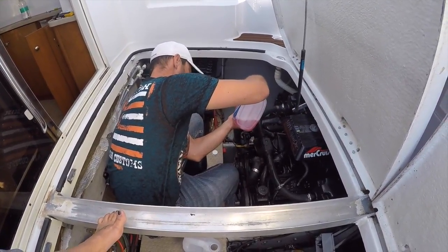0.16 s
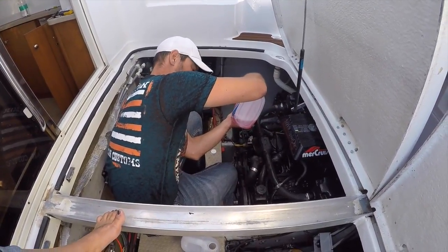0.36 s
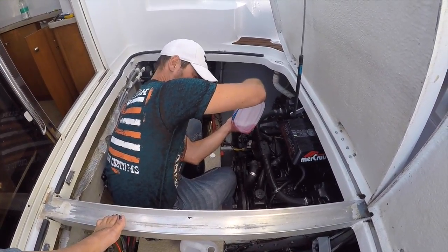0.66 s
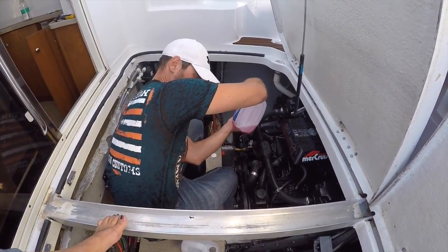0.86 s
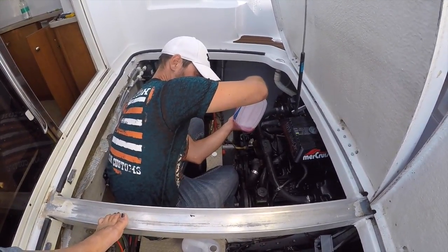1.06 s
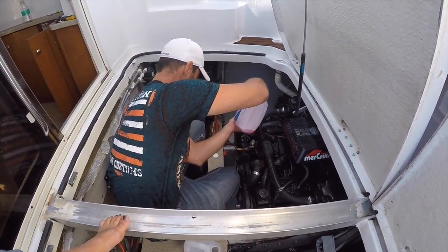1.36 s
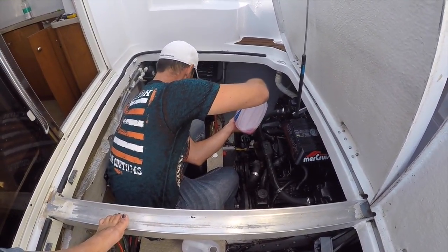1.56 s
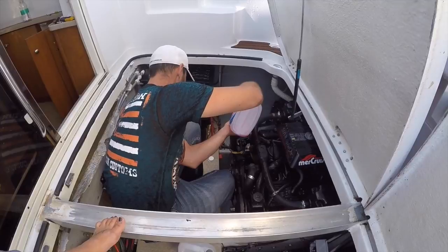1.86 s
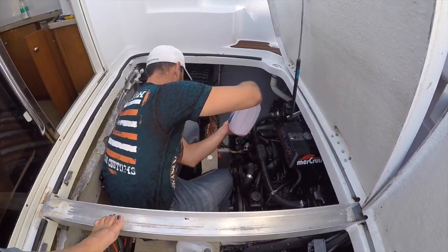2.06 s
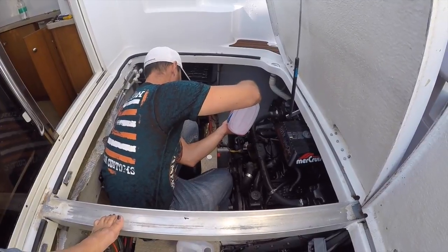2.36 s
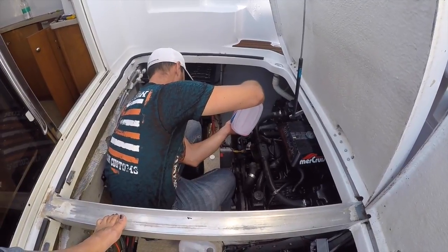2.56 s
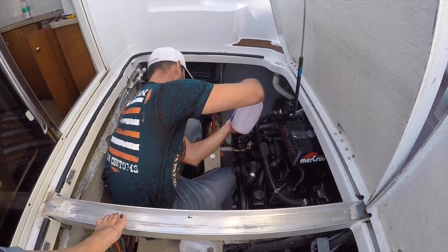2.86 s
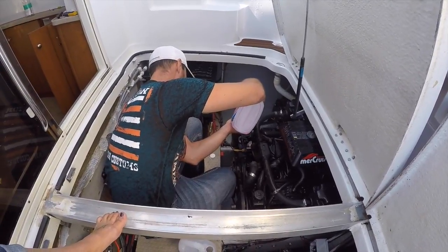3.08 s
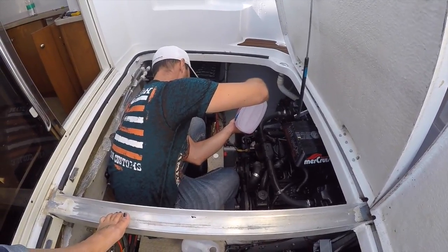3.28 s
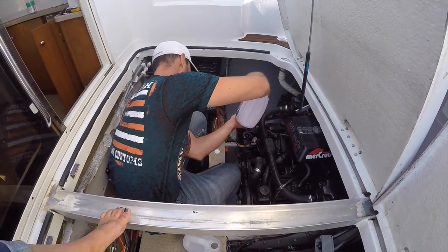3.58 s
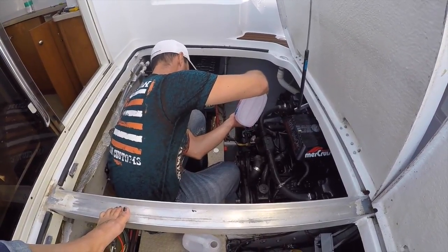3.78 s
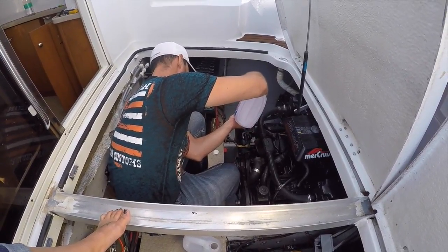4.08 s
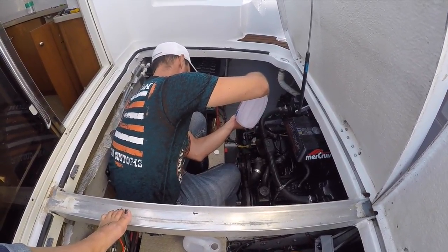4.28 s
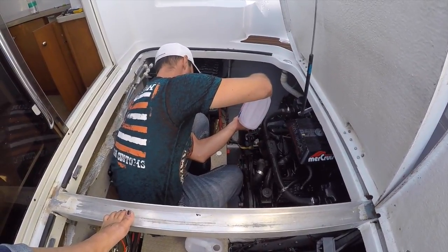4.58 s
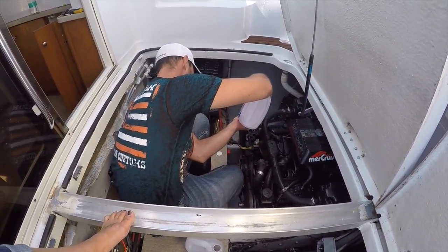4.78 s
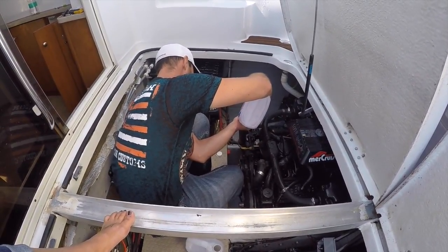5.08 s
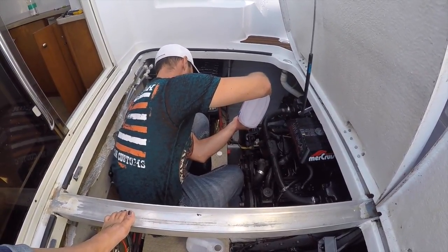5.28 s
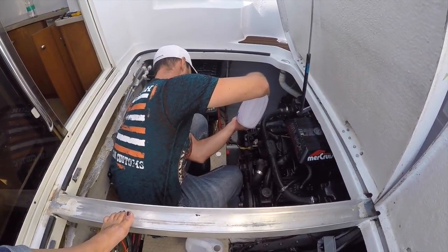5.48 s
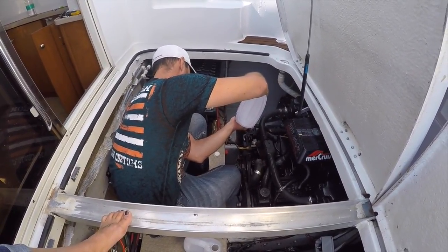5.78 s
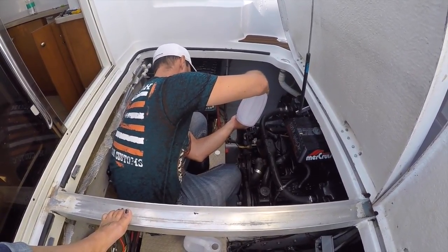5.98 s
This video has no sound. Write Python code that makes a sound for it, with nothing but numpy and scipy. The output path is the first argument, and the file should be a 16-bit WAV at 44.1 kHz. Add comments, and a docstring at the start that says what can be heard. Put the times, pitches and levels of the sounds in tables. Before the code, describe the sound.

Close, hollow glugging and wet trickling as a plastic jug empties into a hose in a boat's engine space, light wind thumping the microphone.

```python
"""Air glugs into an upturned plastic jug about three times a second as its liquid runs into a hose in a boat.
Large bubbles ring as gliding sines and knock the hollow of the jug; bubble swarms and noise gurgle and spatter.
Sharp ticks and dull glug onsets are noise bursts with short rings. Close walls of the engine space reflect it all.
Light gusts buffet the microphone ports as low noise; behind lie still air, the camera's hiss and a faint whine."""
import sys
import numpy as np
from scipy import signal
from scipy.fft import rfft, irfft, next_fast_len
from scipy.io import wavfile
from scipy.ndimage import uniform_filter1d, map_coordinates

SR = 44100
rng = np.random.default_rng(int(sys.argv[2]) if len(sys.argv) > 2 else 0)


def unload_audio(sound):
    """Save the sound as a 16-bit wav file, at the path given as the first command line argument."""
    columns = np.transpose(np.atleast_2d(sound))
    # keep every value between -1 and 1, then stretch to whole-number steps
    steps = np.round(np.clip(columns, -1, 1) * 32767)
    wavfile.write(sys.argv[1], SR, steps.astype(np.int16))


N = 270620


def glugs(rise=0.043, ring_db=-1.0, knock_db=5, knock_t60_s=0.092, plop_db=-3.0):
    """Large bubbles ring; low ones knock the jug's hollow most, those near 1130 Hz break with the wettest plop."""
    # loudest single bubbles and drops: start_s, pitch_hz, level_db (before the part levels above)
    large_bubbles = [(0.044, 255, -45), (0.238, 468, -47.5), (0.346, 252, -48), (0.358, 155, -42),
                     (0.537, 476, -49), (0.631, 422, -50), (0.665, 320, -42.5), (0.761, 1530, -57),
                     (0.787, 1006, -56), (0.861, 640, -50), (1.023, 252, -46), (1.05, 300, -40),
                     (1.26, 590, -46), (1.271, 306, -53), (1.277, 154, -42), (1.333, 3650, -49),
                     (1.586, 144, -41.5), (1.633, 313, -43), (1.965, 476, -47.5), (2.008, 646, -54),
                     (2.052, 1050, -56), (2.253, 232, -47), (2.369, 980, -56.5), (2.427, 520, -48),
                     (2.51, 253, -44), (2.517, 633, -47), (2.695, 154, -45), (2.7, 263, -43.5),
                     (2.752, 295, -47), (3.077, 160, -41), (3.087, 210, -45.5), (3.107, 1213, -53),
                     (3.161, 258, -44.5), (3.166, 663, -48), (3.409, 199, -43), (3.423, 221, -45),
                     (3.424, 816, -41.5), (3.722, 995, -53), (4.009, 1010, -52), (4.129, 3404, -52),
                     (4.262, 462, -48.5), (4.387, 4590, -50), (4.581, 280, -50), (4.611, 1050, -50.5),
                     (4.872, 335, -39.5), (4.922, 297, -40.5), (4.943, 1080, -53), (4.971, 1660, -57),
                     (5.152, 483, -47), (5.164, 297, -47), (5.2, 875, -54), (5.469, 975, -47.5),
                     (5.67, 224, -46.5), (5.717, 765, -46.5), (5.718, 238, -46.5), (5.985, 1000, -50),
                     (5.991, 238, -49)]
    ref_t60_s, ref_hz, t60_slope = 0.087, 294, 0.33  # smaller bubbles die sooner, by this power of pitch
    t = np.arange(SR // 4) / SR
    rings, knocks = np.zeros(N), np.zeros(N)
    for start_s, hz, db in large_bubbles:
        t60_s = ref_t60_s * (ref_hz / hz) ** t60_slope
        glide = rise * min(1, 700 / hz)  # small bubbles hardly glide
        add(rings, start_s, amp(db + ring_db) * bubble(t, hz, t60_s, glide))

        plop = around(hz, 1130, octaves=1.74) * burst(hz, octaves=0.54, t60_s=0.086)
        add(rings, start_s, amp(db + plop_db) * plop)

        knock = min(1, 400 / hz) * amp(-60 * t / knock_t60_s) * rng.standard_normal(len(t))
        add(knocks, start_s, amp(db + knock_db) * knock)
    return in_space(rings + filtered(knocks, hollow), left_db=-2.5)


def stream():
    """Air gulps into the jug, liquid gurgles down the hose, droplets splash and throw a fine spray."""
    # spectra of air gulps, hose gurgle, splash, middle-sized drops, fine spray: freq_hz, level_db (per Hz)
    gulp_spectrum = [(70, -24), (120, 13), (160, -4), (220, -7), (300, -1.5), (370, -7), (480, -14),
                     (900, -60)]
    gurgle_spectrum = [(250, -24), (400, 1.5), (480, -0.5), (650, 1), (850, -4.5), (1100, -5), (1500, -35),
                       (2500, -46)]
    splash_spectrum = [(600, -4), (1200, -7), (1750, 0), (2400, -4.5), (3100, -5), (4000, -24), (6000, -44)]
    trickle_spectrum = [(2200, -47), (3200, -4.5), (3800, 1), (4150, -2.5), (4550, -1), (5100, -2),
                        (5800, -17), (8000, -10)]
    spray_spectrum = [(3000, -31), (5500, 2), (8000, 0), (9500, 1.5), (12000, -0.5), (15000, 1.5)]
    gulp_gain, splash_gain, trickle_gain, spray_gain = pouring()

    air = swarm(rate_hz=180, low_hz=136.4, high_hz=344.4, cycles=11.7, spread_db=8.5, rise=0.11, size=4096)
    gulp = churn(air, gulp_spectrum, hollow_db=1)

    hose = swarm(rate_hz=300, low_hz=382.3, high_hz=1437, cycles=31.0, spread_db=9.5, rise=0.048, size=2600)
    gurgle = churn(hose, gurgle_spectrum, hollow_db=-2)

    drops = swarm(rate_hz=260, low_hz=1074, high_hz=3220, cycles=20.0, spread_db=4.0, rise=0.12, size=800)
    splash = coloured(drops + amp(-4) * rng.standard_normal(N), splash_spectrum)

    droplets = swarm(rate_hz=260, low_hz=2880, high_hz=6230, cycles=21, spread_db=9.5, rise=0.09, size=400)
    trickle = coloured(droplets + amp(-7.5) * rng.standard_normal(N), trickle_spectrum)

    mist = swarm(rate_hz=900, low_hz=4440, high_hz=14400, cycles=5.5, spread_db=49, rise=0.17, size=64)
    spray = coloured(mist + amp(-20.0) * rng.standard_normal(N), spray_spectrum)

    spatter = amp(-5) * splash_gain * splash
    spatter += amp(2.06) * trickle_gain * trickle
    spatter += amp(1) * spray_gain * spray
    return (in_space(amp(-3) * gulp_gain * gulp, left_db=-4.5)
            + in_space(amp(-2.0) * splash_gain * gurgle, left_db=-0.5)
            + in_space(spatter, left_db=-1.4))


def pouring(flow_gulp_db=-2, flow_spray_db=-8, flow_trickle_db=-6, slosh_trickle_db=-5.0):
    """Gains of gulp, splash, trickle and spray: glugs and sloshes ride on a thinning flow; powers add."""
    # air gulping into the jug: start_s, length_s, gulp_db, splash_db, spray_db
    glug_rows = [(0.045, 0.033, -51.5, -67, -82), (0.356, 0.049, -50, -64.5, -67),
                 (0.666, 0.041, -49.5, -60.5, -67), (1.041, 0.034, -55.5, -67, -66.5),
                 (1.259, 0.047, -52.5, -61, -66), (1.591, 0.046, -57, -61, -65.5),
                 (1.906, 0.086, -56, -60, -65), (2.21, 0.02, -55.5, -68, -68),
                 (2.488, 0.098, -56, -60.5, -66), (2.732, 0.048, -54.5, -63.5, -66),
                 (3.065, 0.14, -57, -69, -70), (3.383, 0.07, -54.5, -65.5, -67.5),
                 (3.652, 0.061, -56.5, -63.5, -70.5), (3.985, 0.039, -52.5, -62, -68),
                 (4.29, 0.027, -57, -59.5, -67.5), (4.573, 0.039, -54.5, -62.5, -68.5),
                 (4.894, 0.053, -58, -61.5, -70), (5.153, 0.04, -58.5, -64.5, -67),
                 (5.463, 0.018, -61, -65, -64), (5.629, 0.082, -58, -64, -67),
                 (5.942, 0.035, -57, -70, -75)]
    # slugs of liquid landing in the hose between glugs: start_s, splash_db, spray_db
    slosh_rows = [(0.0, -57.5, -67), (0.14, -67, -81), (0.245, -61.5, -67), (0.54, -61, -75),
                  (0.615, -63, -76), (0.755, -63, -76), (0.87, -60, -71), (1.17, -60.5, -66),
                  (1.335, -62, -78), (1.41, -67, -80), (1.47, -73, -69), (1.71, -62, -82),
                  (2.055, -61, -70), (2.125, -73, -69), (2.31, -58, -72), (2.44, -62, -79),
                  (2.6, -62.5, -68), (2.82, -59.5, -88), (2.88, -77, -69), (3.49, -63.5, -82),
                  (4.19, -64.5, -68.5), (4.39, -64.5, -66.5), (4.515, -62, -72), (4.69, -66, -68),
                  (4.83, -69, -71), (4.97, -67, -80), (5.21, -68, -73), (5.31, -64.5, -71),
                  (5.39, -61.5, -67), (5.75, -61.5, -74)]
    flow_db, thinning_db_per_s, uneven_db = -68, 0.45, 1.5  # thins as the jug empties
    trickle_db, trickle_growth_db_per_s = -4, 0.5  # over the glug's spray; stands out more as the jug empties

    start_s, length_s, gulp_db, splash_db, spray_db = np.transpose(glug_rows)
    patter_db = spray_db + trickle_db + trickle_growth_db_per_s * start_s
    glug_gulp = surges(start_s, length_s, gulp_db, swell_s=0.031, fall_db_per_s=320)
    glug_splash = surges(start_s, length_s, splash_db, swell_s=0.031, fall_db_per_s=200)
    glug_spray = surges(start_s, length_s, spray_db, swell_s=0.031, fall_db_per_s=170)
    # longer swell: drops patter ahead of each glug, before the air breaks in
    glug_trickle = surges(start_s, length_s, patter_db, swell_s=0.11, fall_db_per_s=310)

    slosh_s, slosh_splash_db, slosh_spray_db = np.transpose(slosh_rows)
    slosh = surges(slosh_s, 0.0075, slosh_splash_db, swell_s=0.051, fall_db_per_s=240)
    thrown = surges(slosh_s, 0.0075, slosh_spray_db, swell_s=0.051, fall_db_per_s=240)
    slosh_trickle = amp(slosh_trickle_db) * np.sqrt(slosh * thrown)

    flow = amp(flow_db - thinning_db_per_s * np.arange(N) / SR + uneven_db * wobble(14))
    gulp = [glug_gulp, slosh, amp(flow_gulp_db) * flow]
    splash = [glug_splash, slosh, flow]
    trickle = [glug_trickle, slosh_trickle, amp(flow_trickle_db) * flow]
    spray = [glug_spray, thrown, amp(flow_spray_db) * flow]
    return np.linalg.norm([gulp, splash, trickle, spray], axis=1)


def ticks_and_onsets(noise_t60_s=0.025, noise_db=-6, ring_db=-11):
    """Sharp ticks, and the dull noisy onsets of glugs: a brief burst of noise with short rings near its pitch."""
    # sharp ticks and dull glug onsets: start_s, level_db (before noise_db and ring_db), centre_hz
    onsets = [(0.156, -49, 8500), (0.539, -45, 1750), (0.603, -48, 4530), (1.252, -39, 520),
              (2.252, -41, 1100), (2.469, -44, 1930), (2.608, -47, 6500), (2.745, -44, 3000),
              (2.808, -45.5, 800), (3.082, -47.5, 6100), (3.094, -47, 1150), (3.727, -46, 1300),
              (4.003, -48, 2000), (4.022, -46, 1500), (4.263, -37.5, 3280), (4.514, -45, 2600),
              (4.684, -48.5, 6840), (4.919, -48, 5500), (5.159, -46, 8000), (5.196, -46, 2200),
              (5.454, -45, 1050), (5.717, -50, 796), (5.981, -44.5, 1800)]
    # modes of the jug's plastic wall: freq_hz, level_db, t60_s
    wall_modes = [(1517, 0, 0.04), (1785, 0, 0.031), (2458, -6, 0.078), (3200, -7, 0.02),
                  (3764, -16, 0.074), (4540, -3, 0.052), (5160, -2, 0.045), (7030, -3, 0.017),
                  (9050, -9, .012)]
    track, t = np.zeros(N), np.arange(4096) / SR
    for start_s, db, centre_hz in onsets:
        ring = 0
        for hz, mode_db, t60_s in wall_modes:
            strength = amp(mode_db + rng.normal(0, 5.0)) * around(hz, centre_hz, octaves=1.1)
            ring = ring + strength * bubble(t, hz, t60_s, rise=0)
        noise = burst(centre_hz, octaves=1.3, t60_s=noise_t60_s)
        add(track, start_s, amp(db + ring_db) * ring + amp(db + noise_db) * noise)
    return in_space(track, left_db=-3.0)


def wind(strong_db=-36, steepness=1.92, flutter_db=1.4):
    """Eddies push on each port separately; the small, faster ones grow most in strong gusts."""
    # gusts on the microphone ports: start_s, length_s, level_db, left_over_right_db
    gust_rows = [(0.015, 0.022, -38.5, -6), (0.11, 0.01, -45, 6), (0.404, 0.063, -42.5, 2),
                 (0.495, 0.034, -33.5, -8), (0.587, 0.13, -36, -3), (0.785, 0.011, -34.5, -4),
                 (0.904, 0.022, -43.5, 2.5), (1.066, 0.028, -38, -1), (1.144, 0.01, -45, -8),
                 (1.21, 0.022, -40, 6), (1.288, 0.084, -45.5, 3), (1.59, 0.076, -50, -8),
                 (1.84, 0.076, -50, -8), (3.698, 0.038, -40.5, -16.5), (3.759, 0.013, -35.5, -11),
                 (3.888, 0.2, -40.5, -9.5), (4.089, 0.066, -36.5, -8), (4.234, 0.11, -44.5, -8),
                 (4.488, 0.049, -39, 9.5), (4.649, 0.028, -43, -5), (4.768, 0.022, -41, 13),
                 (4.87, 0.02, -40.5, 6), (4.934, 0.17, -46.5, -1), (5.657, 0.07, -49, 0),
                 (5.89, 0.017, -52, 9), (6.056, 0.024, -46, -9)]
    # spectra of the slow rumble and of the small, fast eddies: freq_hz, level_db (per Hz)
    rumble_spectrum = [(10, -3), (22, 2.5), (35, 3.5), (55, -5), (75, -9), (110, -29), (200, -32),
                       (500, -102)]
    eddy_spectrum = [(30, -27), (60, 9), (80, 4.5), (120, -4.5), (170, -18.5), (250, -30), (600, -70)]
    breeze_db, breeze_left_db = -55, -3.5  # light air between gusts

    start_s, length_s, db, left_db = np.transpose(gust_rows)
    gusts = []
    for side in (1, -1):  # left, right: the two share each gust's power
        port_db = db + 10 * np.log10(2 / (1 + amp(-side * left_db) ** 2))
        gusts.append(surges(start_s, length_s, port_db, swell_s=0.03, fall_db_per_s=177))
    breeze = panned(amp(breeze_db + flutter_db * wobble(8.7)), breeze_left_db)
    push = np.hypot(gusts, breeze)

    # left-right likeness: (freq_hz, coherence)
    slow = even(stereo_noise(rumble_spectrum, [(40, 0.13), (150, 0.27)]), span_s=0.099)
    fast = even(stereo_noise(eddy_spectrum, [(40, 0.19), (150, 0.45)]), span_s=0.061)
    fast_gain = amp(strong_db - 5.0) * (push / amp(strong_db)) ** steepness
    return amp(-0.5) * push * slow + fast_gain * fast


def background():
    """Still outdoor air and the camera's hiss as one stereo noise, with a thin whine of steady sines."""
    # spectrum of the still air and hiss: freq_hz, level_db (per Hz)
    still_spectrum = [(15, -11), (25, 0), (49, -1.5), (177, -14.5), (296, -10), (397, -17.5), (454, -16),
                      (563, -25), (627, -16.5), (736, -24.5), (820, -21), (2970, -28.5), (3690, -28.5),
                      (13000, -33), (15300, -28.5)]
    # its left-right likeness: freq_hz, coherence
    still_alike = [(60, 0.53), (300, 0.53), (700, 0.54), (1500, 0.082), (4000, 0.057), (9000, 0.053),
                   (15000, 0.48)]
    # the camera's whine: freq_hz, peak_db (before panning)
    whine_lines = [(14595, -89), (14655, -88), (14775, -86), (14835, -86), (14895, -84), (15015, -84),
                   (15075, -82), (15195, -79), (15255, -88)]
    t = np.arange(N) / SR
    whine = sum(amp(db) * np.sin(2 * np.pi * (hz * t + 0.27 * rng.random())) for hz, db in whine_lines)
    return panned(amp(-58.0) * stereo_noise(still_spectrum, still_alike) + whine, left_db=-2.0)


def bubble(t, hz, t60_s, rise):
    """A bubble swells within about a cycle, then rings down while its pitch rises by the share rise per t60."""
    ring = np.sin(2 * np.pi * hz * t * (1 + rise * t / t60_s / 2))
    return ring * amp(-60 * t / t60_s) * (1 - np.exp(-2 * hz * t))


def swarm(rate_hz, low_hz, high_hz, cycles, spread_db, rise, size):
    """Small bubbles at random moments, rate_hz a second, each falling 60 dB in some cycles; size in samples."""
    when, pitch, strength = rng.random((int(rate_hz * N / SR), 3)).T[:, :, None]
    hz = low_hz * (high_hz / low_hz) ** pitch
    level = amp(spread_db * strength) * hz / low_hz
    grains = level * bubble(np.arange(size) / SR, hz, cycles / hz, rise)
    places = (when * N).astype(int) + np.arange(size)
    return unit(np.bincount(places.ravel(), grains.ravel(), N)[:N])


def churn(bubbles, spectrum, hollow_db):
    """A swarm of bubbles heard directly and through the air resonances."""
    resonant = unit(filtered(bubbles, hollow))
    return even(coloured(bubbles + amp(hollow_db) * resonant, spectrum), span_s=0.055)


def hollow(hz):
    """Summed band-pass response of the air resonances."""
    # air in jug, hose and engine space: freq_hz, width_hz, level_db
    air_modes = [(222, 9.4, -6.5), (238, 14, 4.5), (304, 24, -3), (467, 31, -3), (640.4, 21, -9.5),
                 (815.4, 24, -4.5), (980, 140, -17.5)]
    return sum(amp(db) * 1j * hz * width / (centre * centre - hz * hz + 1j * hz * width)
               for centre, width, db in air_modes)


def in_space(x, left_db):
    """Close walls answer each side differently, and the paths shift as the jug and the body move."""
    # decay of the engine space: freq_hz, t60_s
    space_decay = [(200, 0.26), (1000, 0.12), (4000, 0.12), (12000, 0.14)]
    # reflected over direct sound, more in the treble, which the body shades: freq_hz, ratio_db
    wet_ratio = [(250, -22), (600, -6.5), (1100, -4.5), (2000, 20), (8000, 14)]
    reflected, hop = np.zeros((2, N + SR)), SR // 4
    for start in range(0, N, hop):  # a new pair of noise tails every quarter second
        hz, t, z = signal.stft(rng.standard_normal((2, hop)), SR, nperseg=256)
        decay = amp(-60 * t / along(space_decay, hz)[:, None])
        tail = signal.istft(z * decay, SR, nperseg=256)[1]
        answer = signal.fftconvolve(x[None, start:start + hop], tail / np.linalg.norm(tail[0]), axes=1)
        reflected[:, start:start + answer.shape[1]] += answer

    def share(hz):  # angle whose cosine and sine weight direct and reflected sound
        return np.arctan(amp(along(wet_ratio, hz)))

    direct = filtered(x, lambda hz: np.cos(share(hz)))
    return panned(direct + filtered(reflected[:, :N], lambda hz: np.sin(share(hz))), left_db)


def surges(starts_s, lengths_s, levels_db, swell_s, fall_db_per_s):
    """Gain of a row of surges: each swells up to its start, holds for its length and falls away."""
    t, power = np.arange(0, N, 32) / SR, 0
    for start_s, length_s, db in np.broadcast(starts_s, lengths_s, levels_db):
        swell = np.clip(1 + (t - start_s) / swell_s, 0, 1)
        fall_db = fall_db_per_s * np.maximum(t - start_s - length_s, 0)
        power = power + (swell * amp(db - fall_db)) ** 2
    return np.interp(np.arange(N) / SR, t, np.sqrt(power))


def wobble(rate_hz):
    """A smooth random curve, rate_hz knots a second."""
    return map_coordinates(rng.standard_normal(400), [np.arange(N) * rate_hz / SR], mode="mirror")


def burst(centre_hz, octaves, t60_s):
    """A short, dying puff of noise around a pitch."""
    t, hz = np.arange(4096) / SR, np.fft.rfftfreq(4096, 1 / SR)
    puff = irfft(rfft(rng.standard_normal(len(t))) * around(hz, centre_hz, octaves))
    return unit(puff) * amp(-60 * t / t60_s)


def around(hz, centre_hz, octaves):
    """A broad bell of gain on the pitch axis."""
    return 1 / (1 + (np.log2((hz + 1) / centre_hz) / octaves) ** 2) ** 1.5


def stereo_noise(spectrum, alike):
    """Two channels of noise with a given coherence, mixed from independent mid and side."""
    def turn(hz):
        return np.arccos(np.clip(along(alike, hz), -1, 1)) / 2

    mid, side = filtered(rng.standard_normal((2, N)), lambda hz: np.array([np.cos(turn(hz)), np.sin(turn(hz))]))
    return coloured(np.array([mid + side, mid - side]), spectrum)


def even(x, span_s):
    """x with its power held steady over span_s, so that later gains alone set its level."""
    power = uniform_filter1d(np.mean(np.atleast_2d(x) ** 2, axis=0), max(int(span_s * SR), 8))
    return x / np.sqrt(np.abs(power) + 0.02 * np.mean(x ** 2))


def coloured(x, spectrum):
    """x shaped by a (Hz, dB) spectrum, at rms 1."""
    return unit(filtered(x, lambda hz: amp(along(spectrum, hz))))


def filtered(x, response):
    """x times a response of frequency."""
    size = next_fast_len(N + SR // 2)
    return irfft(rfft(x, size) * response(np.fft.rfftfreq(size, 1 / SR)), size)[..., :N]


def along(points, hz):
    """(Hz, value) points read on a log axis."""
    point_hz, value = np.transpose(points)
    return np.interp(np.log(hz + 1), np.log(point_hz + 1), value)


def panned(x, left_db):
    """x with the left side left_db above the right."""
    return x * amp(np.array([left_db / 2, -left_db / 2]).reshape(2, -1))


def add(track, start_s, sound):
    """Lay a sound into a track at start_s."""
    start = min(max(round(start_s * SR), 0), N)
    track[start:start + len(sound)] += sound[:N - start]


def unit(x):
    """x scaled to rms 1."""
    return x / np.sqrt(np.mean(x ** 2) + 1e-20)


def amp(db):
    """Decibels to gain."""
    return 10 ** (np.asarray(db) / 20)


def scene():
    """The pouring, the wind and the quiet behind them."""
    return glugs() + stream() + ticks_and_onsets() + wind() + background()


def record(dry, top_hz=15290):
    """The camera keeps nothing above its band limit."""
    return filtered(dry, lambda hz: hz < top_hz)


dry = scene()
out = record(dry)
unload_audio(out)
```